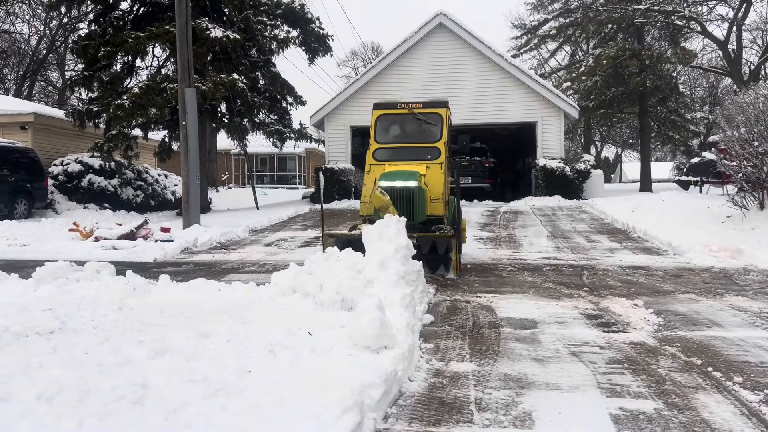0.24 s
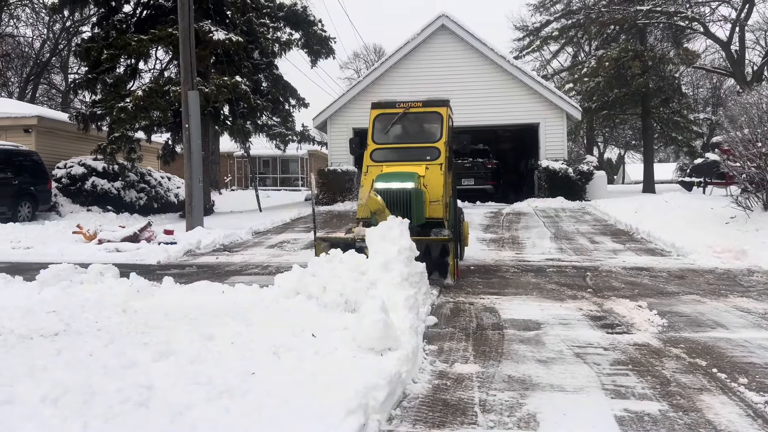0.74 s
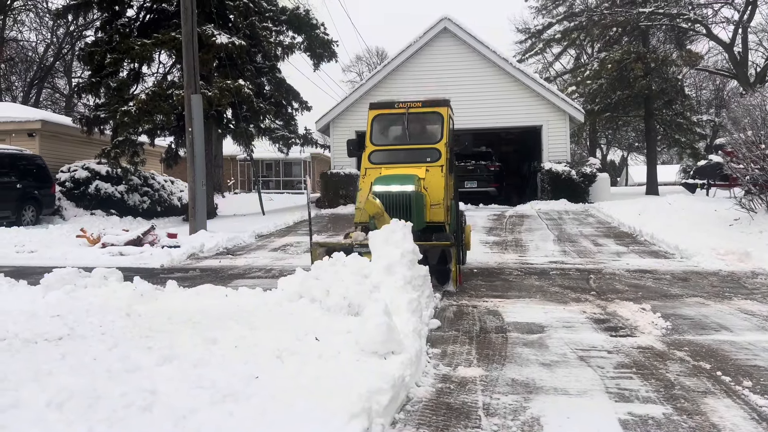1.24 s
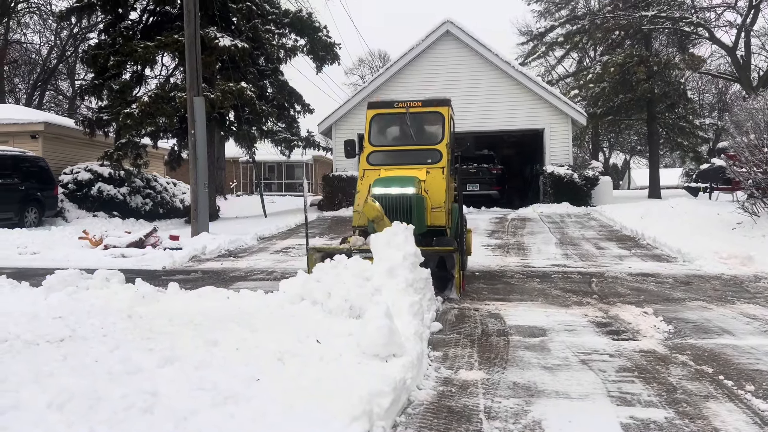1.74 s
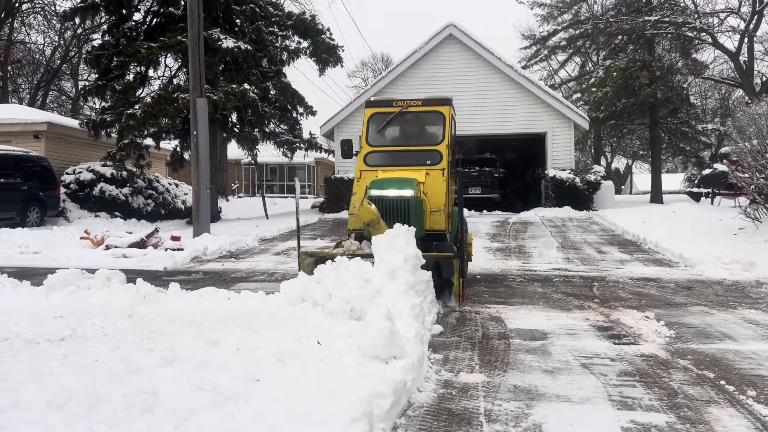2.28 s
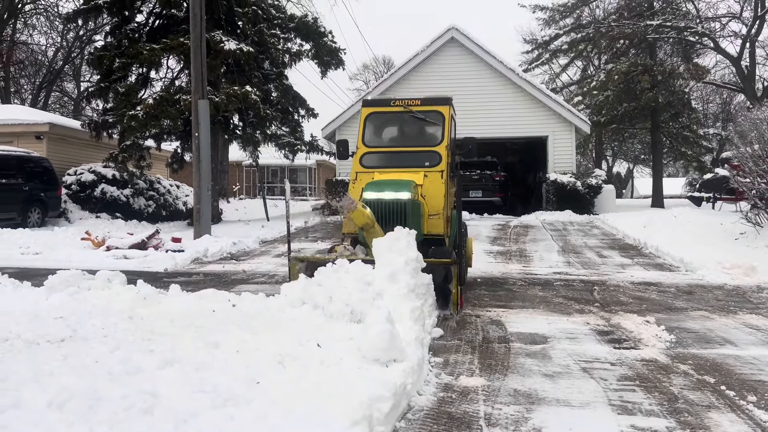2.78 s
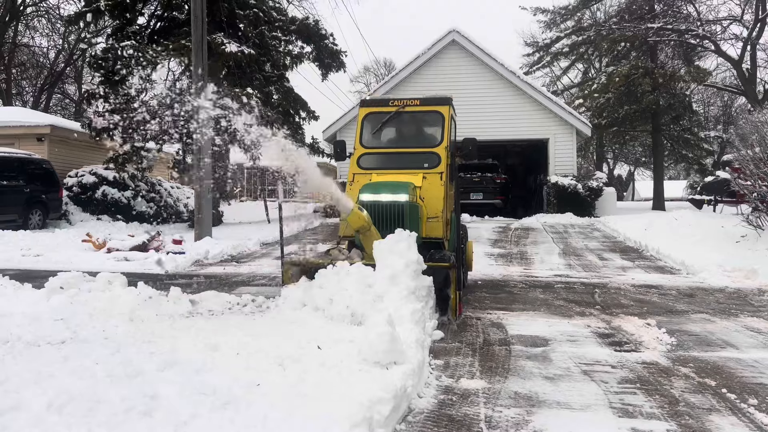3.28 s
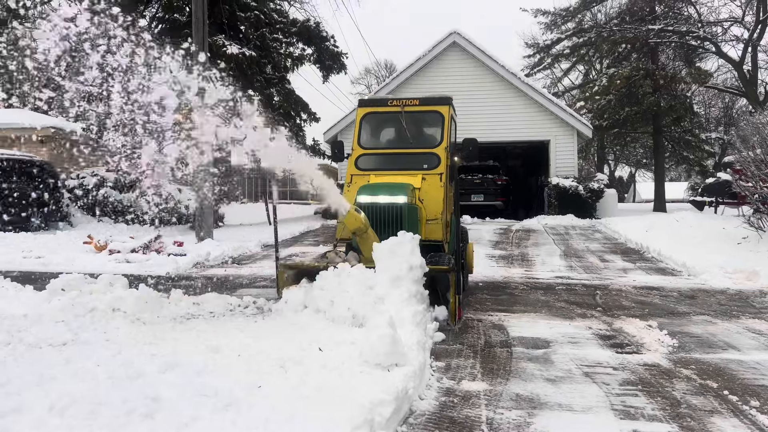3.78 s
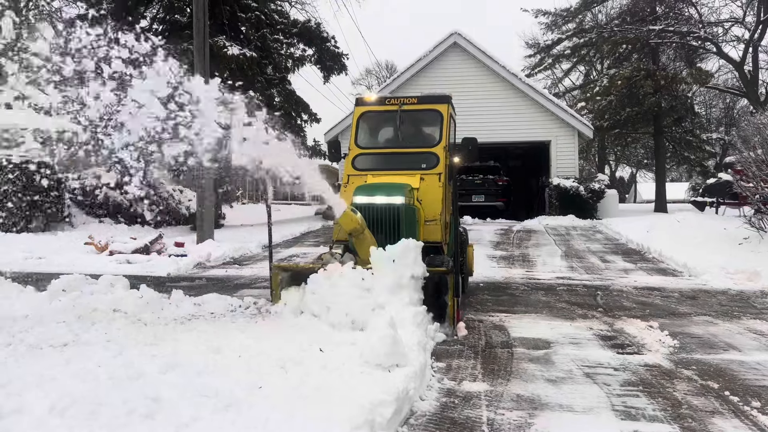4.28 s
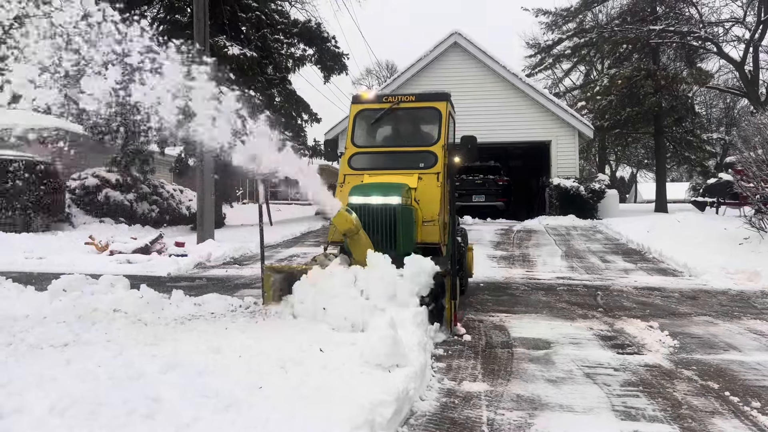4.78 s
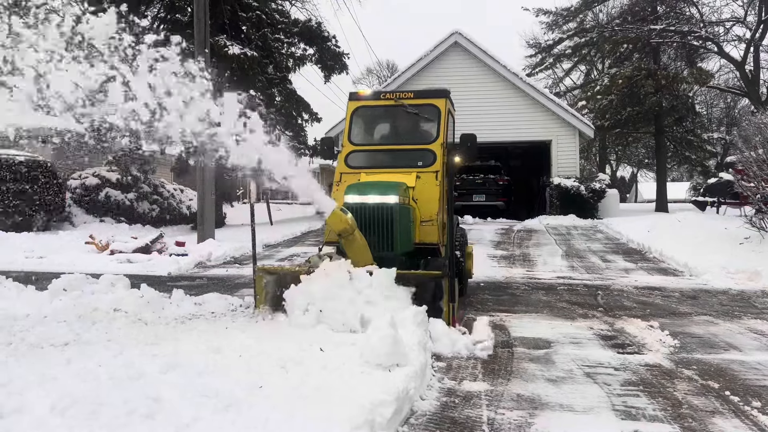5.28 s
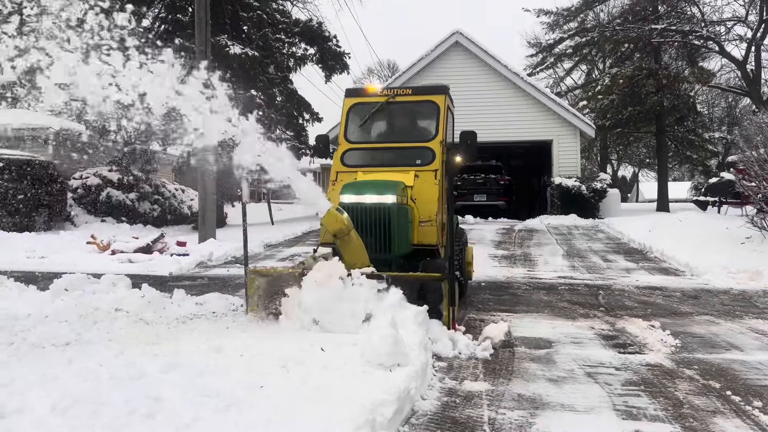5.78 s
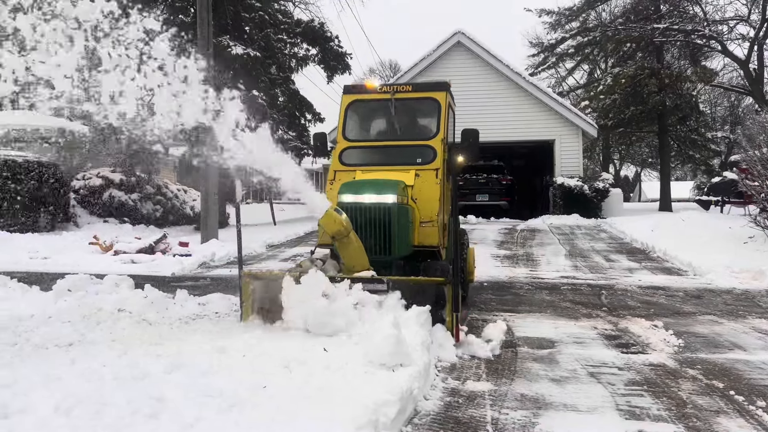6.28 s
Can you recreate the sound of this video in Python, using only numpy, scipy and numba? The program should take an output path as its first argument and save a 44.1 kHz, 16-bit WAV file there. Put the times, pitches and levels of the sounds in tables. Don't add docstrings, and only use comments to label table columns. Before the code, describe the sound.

From 0 s a small two-cylinder tractor engine is already running: a low, buzzing exhaust drone near 54 turns per second with a slow beating from belt-driven blower paddles, over a moderate rumble and airy roar. Through 2.5 s it creeps nearer on an open driveway, the hiss and upper roar growing brighter while the pitch barely wavers. From about 2.8 s the blower bites into wet snow; the engine drops in pitch to its lowest near 3.8 s, its beat turning lumpier and heavier. Gear whine rises, the packed steel chute gives a narrow, scraping ring near 1.9 kHz, and the housing's hiss flutters with loose snow lumps. By 4.6 s the speed partly recovers, then sags slightly again around 5.6 s. The loud, dense, labouring roar continues steadily until it stops at 6.5 s, mid-work. Close outdoor stereo pickup, the two sides differing in tone, with the extreme top cut off.

```python
import sys
import numpy as np
from scipy import signal
from scipy.fft import rfft, irfft
from scipy.io import wavfile
from scipy.ndimage import uniform_filter1d
from numba import njit

SR = 44100
rng = np.random.default_rng(int(sys.argv[2]) if len(sys.argv) > 2 else 0)


def voltage_ratio(decibels):
    exponent = np.asarray(decibels, float) / 20
    return 10 ** exponent


def dump(signal):
    limited = np.clip(np.atleast_2d(signal).T, -1, 1)
    pcm = np.round(limited * 32767).astype(np.int16)
    wavfile.write(sys.argv[1], SR, pcm)


N = 287973
TIME = np.arange(N) / SR
FREQ = np.fft.rfftfreq(N, 1 / SR)


def curves(table):
    s, *columns = np.transpose(table)
    return [np.interp(TIME, s, column) for column in columns]


def over_freq(table, freq=FREQ):
    hz, value = np.transpose(table)
    return np.interp(np.log(freq + 1), np.log(hz), value)


def unit(x):
    return x / np.sqrt(np.mean(x ** 2))


def walk(rate):
    hold = int(SR / rate)
    stairs = np.repeat(rng.standard_normal(N // hold + 1), hold)
    return unit(uniform_filter1d(uniform_filter1d(stairs, hold), hold)[:N])


@njit
def svf(x, hz, width):
    y, band, low = np.empty(len(x)), 0., 0.
    for i in range(len(x)):
        g, k = np.tan(np.pi * hz[i] / SR), width / hz[i]
        v = (band + g * (x[i] - low)) / (1 + g * (g + k))
        band, low, y[i] = 2 * v - band, low + 2 * g * v, k * v
    return y


def resonate_twice(x, hz, width):
    return svf(svf(x, hz, 1. * width), hz, 1. * width)


def law(row, near_db, load):
    return row[0] + row[1] * near_db + row[2] * load


def uneven_burns(turn):
    at = np.flatnonzero(np.diff(turn // (2 * np.pi)))
    burns = np.zeros(N)
    burns[at] = rng.standard_normal((N // 500, 1))[:len(at), 0]
    # (frequency [Hz], width [Hz], level [dB])
    muffler = [(88.6, 90, -2), (123, 52, 6.5), (185, 64, 1.5)]
    return unit(sum(voltage_ratio(db) * resonate_twice(burns, np.full(N, float(f)), w) for f, w, db in muffler))


def exhaust(turn, first_db, second_db, third_db, lope_db, uneven_db):
    # (crank multiple, level [dB])
    upper_orders = [(4, -15), (6, -22.5), (6.5, -26.5), (7.5, -29), (8, -22.5), (9, -26), (10, -22.5),
                    (12, -38), (13.5, -32), (18, -25.5), (22.5, -29.5), (27, -32.5)]

    def lag(k):
        return .6 + .36 * TIME + 1.85 * (k - 2) + .65 * (k - 2) ** 2

    shake = 0.26 * voltage_ratio((uneven_db - uneven_db.mean()) / 2)

    def tone(k, db):
        return np.sqrt(2) * voltage_ratio(db) * np.cos(k * turn - lag(k) + shake * walk(17))

    def half(k, db):
        return np.sqrt(2) * voltage_ratio(db) * np.cos(k * turn + 2.4 - 3.45 * (k - 3 / 2) + .3 * walk(3.95))

    out = np.sqrt(2) * voltage_ratio(first_db) * np.cos(turn)
    out += tone(2, second_db + 0.59 * walk(11)) + tone(3, third_db + 0.92 * walk(14))
    out += half(2.5, lope_db) + half(1.5, lope_db - 7 + 2.1 * walk(3.95))
    out += half(4.7, lope_db - 15 + 3 * walk(3.93))
    out += tone(5, lope_db - 5.5 + 2.6 * walk(6))
    mean_db = uniform_filter1d((first_db + second_db + third_db) / 3, size=SR // 2)
    out += sum(tone(k, mean_db + db + 2.6 * walk(9)) for k, db in upper_orders)
    return out + voltage_ratio(uneven_db) * uneven_burns(turn)


def paddles(spin, level_db, load):
    # (impeller multiple, level [dB], added by full load [dB])
    paddle_orders = [(3.99, -3, -1), (5.02, -14, -9), (6.005, -3.5, -1), (7, -2, -9), (8, -1, 2),
                     (9, -1.5, -8), (10.01, -4, 5), (10.98, -7.5, -4), (12, 2, -4), (14.04, -10.5, 0),
                     (15, -7, -10.5), (15.98, -3, -4), (18, -5, -10), (19.98, -1, -12.5), (22.03, -4, -12)]
    out = 0
    for multiple, db, load_db in paddle_orders:
        m = round(multiple)
        lag = .42 + .7 * m - .0175 * m ** 2
        strength = np.sqrt(2) * voltage_ratio(level_db + db + load_db * load + 1.4 * walk(5))
        out = out + strength * np.cos(m * spin - lag + 0.22 * walk(6))
    return out


def whine(turn, table, level_db):
    out = 0
    for k, db, smear_hz in table:
        slip = 2 * np.pi * np.cumsum(smear_hz * walk(40)) / SR
        out = out + np.sqrt(2) * voltage_ratio(level_db + db + 1.7 * walk(15)) * np.cos(k * turn + slip)
    return out


def gears(spin, level_db):
    # (impeller multiple, level [dB], smear [Hz])
    gear_tones = [
        (75, 0, 1.2),
        (204.3, -10, 4),
        (225, -3, 2),
    ]
    return whine(spin, gear_tones, level_db)


def chute(spin, load_db, blade_db):
    # (impeller multiple, level [dB], smear [Hz])
    blade_tones = [
        (147.5, -6, 1.8),
        (155.0, -11, 3),
    ]
    # (frequency [Hz], width [Hz], level [dB])
    chute_modes = [
        (1839, 41, -13.5),
        (1944, 41, -14),
        (1870, 490, -8.5),
    ]
    scrape = rng.standard_normal(N)
    drift = 1 + 0.0064 * walk(2.7)
    ring = sum(voltage_ratio(db) * unit(resonate_twice(scrape, f * drift, w)) for f, w, db in chute_modes)
    return whine(spin, blade_tones, blade_db) + voltage_ratio(load_db) * ring


def machine(turn, band_db, throttle):
    band_hz = [
        200,
        450,
        1300,
        4500,
        9500,
        14500,
    ]
    # (frequency [Hz], density [dB per Hz])
    body = [(30, -16), (60, 3.5), (180, 1.5), (310, -0.5), (560, -6.5), (720, -6.5), (1200, -9),
            (2000, -8.5), (2480, -12), (3500, -15), (6500, -16.5), (8000, -20.5), (12500, -26),
            (15500, -28)]
    # (frequency [Hz], width [Hz], level
    # [dB])
    panels = [
        (520, 120, 0),
        (630, 50, 0),
        (1150, 50, 3),
        (1290, 90, 0),
        (1466, 35, 3),
        (10500, 1500, 1.5),
        (15400, 1200, 0),
    ]
    # (empty [Hz], full [Hz], width [Hz], empty level [dB], full level [dB])
    housing = [
        (2955, 2930, 235, -1, -3),
        (3990, 3760, 240, -1.5, 0.5),
        (4530, 4570, 224, 5, -0.5),
        (5100, 5120, 173, 0.5, 4),
        (6130, 5990, 330, 1.5, 1),
        (6630, 6500, 170, 4.5, 6.5),
    ]
    full = np.interp(TIME, [2.4, 3.7], [0, 1])
    rings = [(np.full(N, float(f)), w, db) for f, w, db in panels]
    for empty_hz, full_hz, w, empty_db, full_db in housing:
        ring_db = empty_db + full * (full_db - empty_db) + 1.5 * walk(3.96)
        rings.append((empty_hz + full * (full_hz - empty_hz), w, ring_db))
    raw = rng.standard_normal((2, N))
    rung = raw + sum(voltage_ratio(db) * np.array([svf(r, f, 1. * w) for r in raw]) for f, w, db in rings)
    spectrum = rfft(rung) * voltage_ratio(over_freq(body))
    pulse_db = [1.2, 1.2, 0.67, 0.56, 1.35, 2.3]
    flicker_db = [.7, 0.76, 0.54, 0.51, 1.0, 1.1]
    puff = (.45 + .8 * throttle) * (np.cos(turn + 1.3) + .45 * np.cos(2 * turn + 3))
    out = 0
    for j, db in enumerate(band_db + band_db[-1:]):
        share = np.interp(np.log(FREQ + 1), np.log(band_hz), np.arange(len(band_hz)) == j)
        wobble_db = pulse_db[j] * puff + flicker_db[j] * (.5 * walk(30) + walk(70))
        out = out + irfft(spectrum * share, N) * voltage_ratio(db - db.mean() + wobble_db)
    return unit(out) * voltage_ratio(-25)


def ports(steady, pair):
    # (frequency [Hz], lead [rad])
    lead = [(30, 0), (320, -.55), (760, 1.3), (1200, .05), (1740, -.6), (1900, .85), (2850, 1.8),
            (3800, .05), (4600, 1.5), (7100, -2.8), (8550, -6.3), (10150, -9.3), (10750, -10.05),
            (11700, -12.1), (12400, -13.1), (14300, -16.3), (15800, -19.3)]
    # (frequency [Hz], level [dB])
    tilt = [(30, 1.3), (150, .8), (270, -2), (560, -10), (980, 5), (1550, 0), (1800, -8), (2100, 1),
            (3100, 8), (4150, -3), (5100, 7.5), (5800, 1), (7100, -4), (8200, 0)]
    # (frequency [Hz], likeness [0-1])
    likeness = [(30, 1), (600, .88), (1500, .93), (2500, .75), (4000, .82), (5300, .4), (6300, .6),
                (7700, .3), (8500, .8), (9200, .72), (10000, .99), (11200, .93), (12000, .98), (16000, .98)]
    edge = 4096
    padded = np.pad(np.vstack([steady, pair]), ((0, 0), (edge, edge)), "reflect")
    tone, one, other = rfft(padded)
    freq = np.fft.rfftfreq(N + 2 * edge, 1 / SR)
    alike = np.clip(over_freq(likeness, freq), 0, 1)
    common = tone + np.sqrt((1 + alike) / 2) * one
    apart = np.sqrt((1 - alike) / 2) * other
    half_way = voltage_ratio(over_freq(tilt, freq) / 2) * np.exp(.5j * over_freq(lead, freq))
    both = np.array([(common + apart) * half_way, (common - apart) / half_way])
    return irfft(both, N + 2 * edge)[:, edge:-edge]


def impeller_angle(turn, hz, load):
    slip = .0135 + .0058 * uniform_filter1d(load, size=SR)
    behind = 2 * np.pi * np.cumsum(hz * slip) / SR
    behind = behind - np.interp(5.5, TIME, behind) + .47
    return (turn - behind) / 4


def governor(load):
    stay = np.exp(-1 / (.75 * SR))
    return signal.lfilter([1 - stay], [1, -stay], load)


def scene():
    # (time [s], crank rate [Hz], snow load [0-1], nearness gain [dB])
    drive = [(0.0, 54.01, .05, 0), (.4, 53.75, 0.02, 1), (.8, 53.44, 0.02, 2), (1.3, 53.74, 0.06, 4),
             (1.7, 53.49, .05, 4.5), (2.1, 53.98, .1, 4.5), (2.45, 54.19, .1, 5.5), (2.8, 53.6, .2, 5.5),
             (3.25, 52.97, .45, 7), (3.6, 51.7, .85, 7), (3.84, 50.6, 1, 8), (4.2, 51.4, .85, 9),
             (4.6, 52.8, .65, 10), (5.2, 52.44, .75, 10), (5.6, 51.92, .85, 10), (5.9, 52.33, 0.89, 10.5),
             (6.2, 52.2, .85, 10.5), (6.53, 52.35, .85, 10)]
    # (far and unloaded level [dB], share of nearness gain, added by full load [dB])
    exhaust_laws = [
        (-23.7, 0, 5.4),
        (-26, .5, -1),
        (-25, -.1, 1.7),
        (-45, .3, 13),
        (-47, 0.37, 9),
    ]
    # (far and unloaded level [dB], share of nearness gain, added by full load [dB])
    roar_laws = [
        (-34, .3, 5),
        (-30, 0.32, -0.5),
        (-33, 0.62, -0.5),
        (-38, 0.97, 0),
        (-46.5, 1.07, 0),
    ]
    hz, load, near_db = (uniform_filter1d(c, size=SR // 8) for c in curves(drive))
    turn = 2 * np.pi * np.cumsum(hz) / SR + .55
    spin = impeller_angle(turn, hz, load)
    throttle = governor(load)

    def level(row):
        return law(row, near_db, load)

    steady = exhaust(turn, *(law(row, near_db, throttle) for row in exhaust_laws))
    steady += paddles(spin, level((-44, .4, 10.5)), load)
    steady += gears(spin, level((-54.5, .6, 7.5)))
    steady += chute(spin, level((-52, .3, 20)), level((-67, 0, 39)))
    roar = machine(turn, [level(row) for row in roar_laws], throttle)
    return ports(steady, roar)


def top_cut(x):
    return signal.sosfilt(signal.butter(12, 17110, fs=SR, output="sos"), x)


def record(dry):
    low_pass = signal.ellip(12, .5, 90, 15740, fs=SR, output="sos")
    mix = signal.sosfilt(low_pass, dry)
    return top_cut(mix)


dry = scene()
out = record(dry)
dump(out)
```